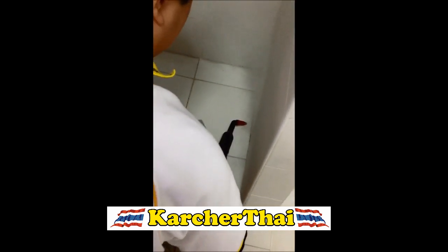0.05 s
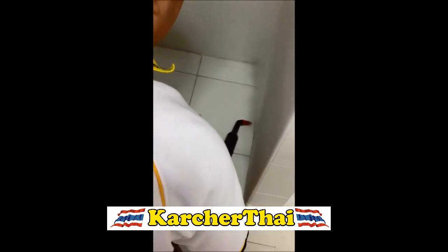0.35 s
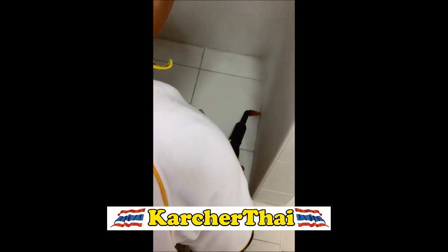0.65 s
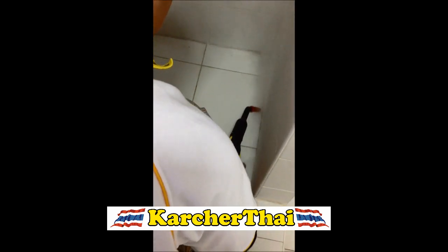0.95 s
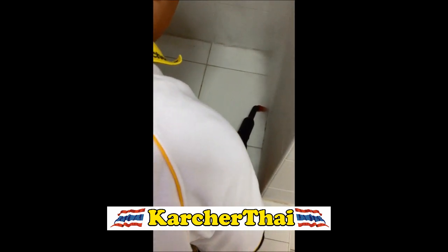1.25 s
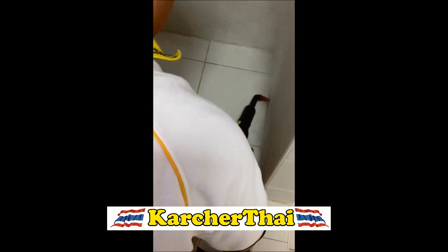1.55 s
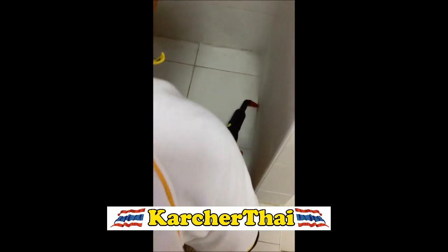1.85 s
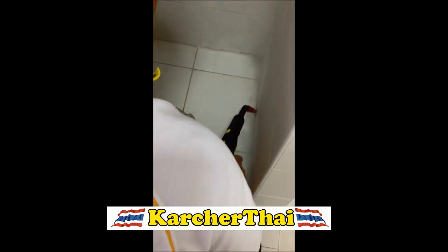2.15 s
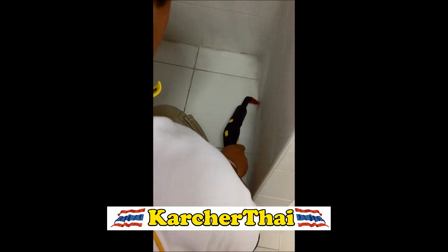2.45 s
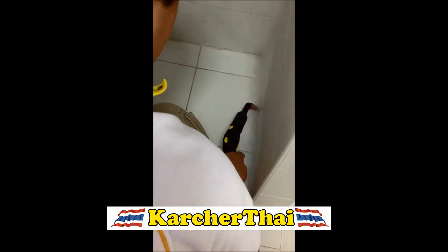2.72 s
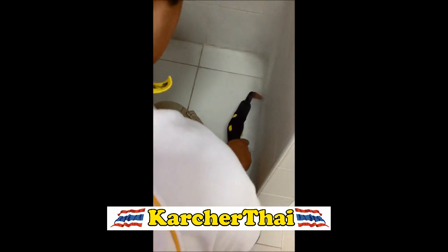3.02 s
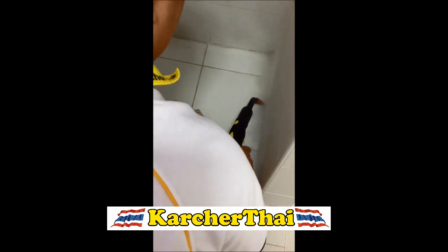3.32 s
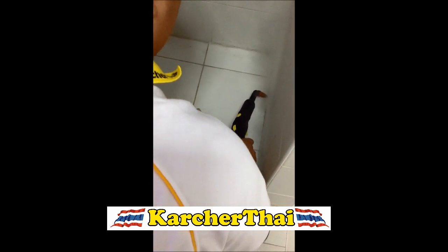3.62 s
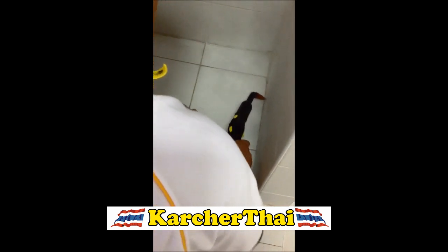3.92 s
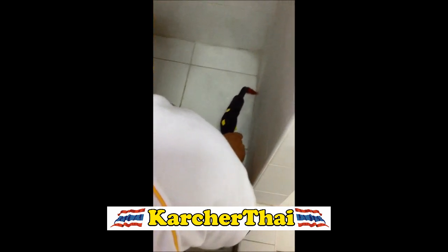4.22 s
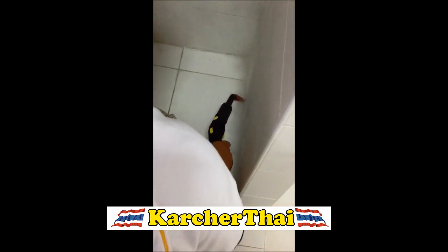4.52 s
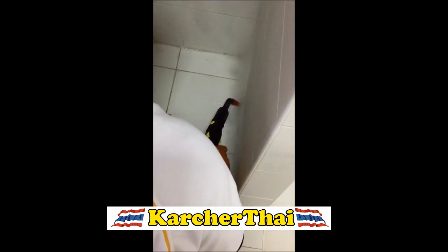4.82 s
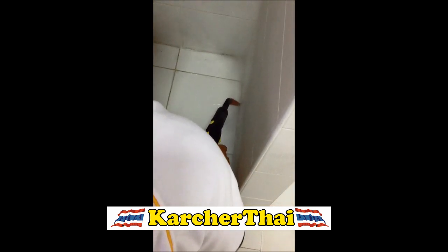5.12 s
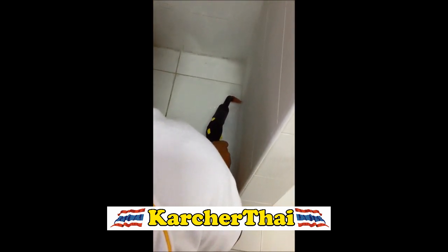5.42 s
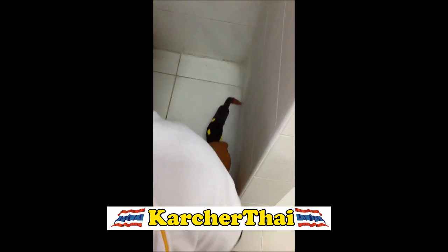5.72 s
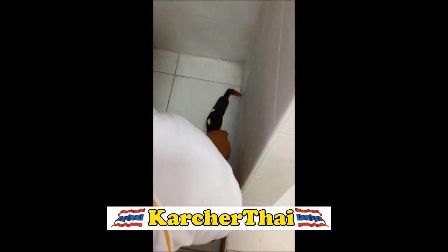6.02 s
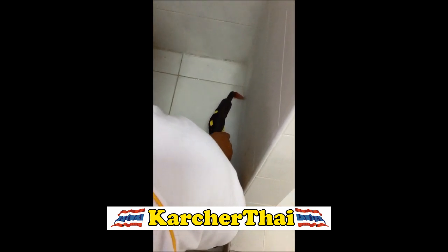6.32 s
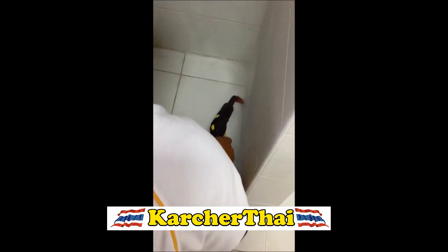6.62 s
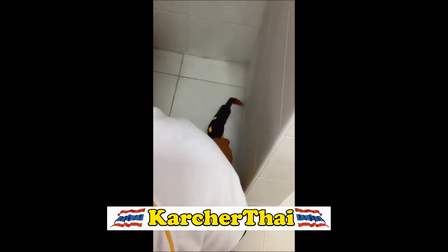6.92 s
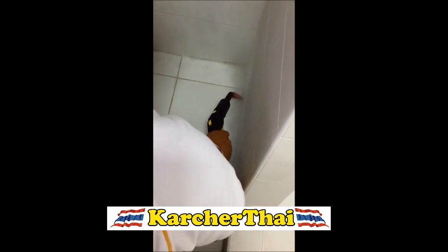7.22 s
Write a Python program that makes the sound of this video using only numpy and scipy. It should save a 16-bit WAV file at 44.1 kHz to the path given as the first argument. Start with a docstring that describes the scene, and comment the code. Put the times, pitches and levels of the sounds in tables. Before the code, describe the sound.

A steam cleaner's hand nozzle hisses loudly and continuously against bathroom tiles, swelling into a roar as it sweeps.

```python
"""Steam jet in a tiled bathroom

A steam cleaner's hand nozzle blasts into the corner of a small bathroom, close to the microphone.
The free jet hisses; where it strikes the tiles it roars, swelling as the hand sweeps it along.
Dense echoes off the near walls ripple the noise and shift with the nozzle, and the room booms at its
modes over a faint rumble. A noise suppressor hollows out the low rush."""
import sys
import numpy as np
from scipy import signal
from scipy.fft import rfft, irfft
from scipy.io import wavfile
from scipy.ndimage import uniform_filter1d

SR = 44100
rng = np.random.default_rng(int(sys.argv[2]) if len(sys.argv) > 2 else 0)


def generate_wav(sig):
    """Save sig (samples, or channels by samples) to the path in sys.argv[1] as 16-bit PCM at SR."""
    pcm = np.round(np.clip(np.atleast_2d(sig).T, -1, 1) * 32767).astype(np.int16)
    wavfile.write(sys.argv[1], SR, pcm)


N = 324576
FRAME, HOP = 2048, 256  # samples

# Tone of the jet. Each row: frequency in Hz, relative level in dB.
JET_TONE = [(300, -9.5), (450, -11.5), (620, -9), (900, -4.5), (1300, -7.5), (1800, -4), (2800, -4.5),
            (4500, -3), (7000, -1.9), (10000, -0.7), (12000, -0.5), (13800, -1.7), (15200, -2.35)]
# The jet's body, roar, rush, hiss and fizz. Each row: centre in Hz, share of the strokes and glances,
# share of the slow roar, share of the turns, drift in dB.
JET_BANDS = [(680.0, 0.38, 0.93, 0.28, 0.6), (1530, 0.72, 1.02, -0.011, 0.4), (3330, 0.9, 0.53, -0.16, 0.5),
             (7140, 0.66, 0.011, 0.42, -0.05), (11700.0, 0.42, 0.086, 0.99, -0.53)]
# The hand sweeps the jet close onto the tiles. Each row: peak time in seconds, attack, hold and release
# in seconds, swell in dB before each band's share, brightening in dB per octave.
STROKES = [(0.182, 0.051, 0.054, 0.044, 1.5, -0.6), (0.43, 0.04, 0.097, 0.094, 4.5, 0),
           (0.712, 0.057, 0.046, 0.071, 5, -0.9), (0.904, 0.12, 0.12, 0.084, 4.5, -0.55),
           (1.092, 0.043, 0.14, 0.048, 4, -0.6), (1.292, 0.04, 0.024, 0.016, 5.5, -0.5),
           (1.514, 0.076, 0.11, 0.033, 2, 0), (1.8, 0.14, 0.16, 0.044, 4, -0.9),
           (2.018, 0.041, 0.023, 0.055, 5.5, -0.5), (2.222, 0.12, 0.026, 0.037, 3.5, -0.5),
           (2.394, 0.062, 0.033, 0.071, 4.5, -0.9), (2.53, 0.07, 0.1, 0.049, 2.5, -0.2),
           (2.695, 0.032, 0.037, 0.019, 4.5, -0.5), (2.829, 0.05, 0.042, 0.037, 2.3, -0.6),
           (3.035, 0.049, 0.039, 0.063, 3.5, 0.1), (3.362, 0.025, 0.02, 0.05, 1.2, -0.5),
           (3.463, 0.1, 0.074, 0.072, 4.5, -0.3), (3.753, 0.14, 0.15, 0.045, 6, -1),
           (3.975, 0.068, 0.085, 0.098, 5.5, -0.4), (4.227, 0.12, 0.056, 0.038, 1, 0.7),
           (4.36, 0.077, 0.066, 0.048, 3, -0.2), (4.585, 0.052, 0.047, 0.076, 0.3, 0.4),
           (4.673, 0.046, 0.075, 0.071, 3.5, 0.3), (4.852, 0.056, 0.021, 0.041, -0.8, 0.3),
           (5.008, 0.052, 0.049, 0.083, 1.5, 0.5), (5.274, 0.053, 0.015, 0.048, 3, 0.3),
           (5.374, 0.054, 0.093, 0.097, 2.1, 0.4), (5.752, 0.074, 0.044, 0.045, 0.5, -0.3),
           (6.074, 0.12, 0.058, 0.045, 5.5, -0.5), (6.196, 0.052, 0.012, 0.049, 3, -0.2),
           (6.696, 0.15, 0.1, 0.033, 2.5, -0.1), (6.857, 0.082, 0.046, 0.06, 5, -0.3),
           (6.974, 0.053, 0.051, 0.026, 3.5, -0.3), (7.308, 0.02, 0.028, 0.05, 4, -0.8)]
# The jet glances off the tiles. Each row: time in seconds, hold in seconds, dip in dB before each
# band's share.
GLANCES = [(1.416, 0.035, 2), (2.847, 0.049, 2), (3.215, 0.085, 2), (4.941, 0.018, 2.5),
           (5.667, 0.015, 1.5), (5.87, 0.04, 2.5), (7.124, 0.075, 3.5)]
# The nozzle turns away and the fizz dulls. Each row: time in seconds, hold and return in seconds,
# dip in dB before each band's share.
TURNS = [(0.01, 0.14, 0.043, 7), (0.48, 0.07, 0.1, 5), (0.93, 0.38, 0.41, 1.5), (3.628, 0.22, 0.346, 4)]
# Slow ride of the roar on the tiles. Each row: time in seconds, level in dB before each band's share.
ROAR_RIDE = [(0.0, 3.5), (0.3, 2.5), (0.85, -2.5), (1.25, -1.7), (1.42, -2), (2.25, -2.5), (2.9, -2.5),
             (3.25, -2.5), (3.85, -3.5), (4.4, 0), (4.9, -2.1), (5.6, -2.5), (6.4, -4.5), (6.9, -3.5),
             (7.15, -3), (7.36, -3.7)]
# Resonances of the tiled corner. Each row: centre in Hz, width in Hz, lift in dB.
CORNER_RESONANCES = [(388, 18, 7), (425, 18, 4), (495, 16, 8.5), (554, 18, 7), (624, 22, -4), (705, 20, 6),
                     (791, 32, 3.2), (867, 18, -3.5), (921, 18, -3), (1070, 32, 3.1), (1200, 18, 6),
                     (1244, 18, 7), (1325, 20, 7), (1394, 18, 2.5), (1427, 18, 4.5), (1470, 32, 3.5),
                     (1529, 18, 4.3), (1879, 18, -4.6), (1920, 32, 2.6), (2158, 32, 3.7), (2401, 24, 5),
                     (2455, 32, 3.2), (2568, 32, 2.4), (2767, 60, 2.6), (2890, 32, 4.2), (3045, 22, 5),
                     (3196, 18, 3.5), (3273, 24, 4.5), (3381, 32, 2.4), (3531, 32, 2.7), (3612, 18, 2.8),
                     (3887, 18, 3.2), (4014, 18, 4), (4052, 24, 3.2), (4296, 18, 2.5), (4339, 18, 1.8),
                     (4683, 60, 2.3), (6029, 32, 2.8), (6228, 32, 2.9), (7327, 60, 2.4), (9284, 60, 1.5),
                     (14072, 80, 2)]
# The jet catches an edge or a resonance and whistles breathily. Each row: peak time in seconds,
# hold in seconds, pitch in Hz, width in Hz, lift in dB.
WHISTLES = [(0.04, 0.056, 650, 110, 9), (0.04, 0.15, 1060, 45, 9), (0.15, 0.5, 2164, 40, 6),
            (.3, .4, 5049, 45, 7), (.45, .25, 1065, 35, 6), (.55, .3, 7525, 50, 6),
            (0.6, 0.65, 3197, 35, 5.5), (.7, .35, 640, 35, 8), (1.07, .28, 4672, 45, 6),
            (1.28, 0.03, 3380, 300, 7), (1.62, .42, 7127, 50, 7), (1.9, .68, 2411, 35, 3.5),
            (2.2, .04, 780, 150, 4), (2.2, .38, 3531, 40, 6), (2.33, 0.15, 2700, 1000, 2),
            (2.43, .33, 4015, 30, 2.5), (2.5, 0.056, 386, 50, 9), (3.55, .3, 4015, 30, 4),
            (3.24, .28, 4683, 45, 5), (3.48, 0.066, 1470, 150, 5.5), (3.72, .28, 6589, 50, 8),
            (3.77, 0.28, 1215, 60, 5), (3.85, 0.18, 3300, 2200, 1.2), (3.87, .03, 850, 250, 4),
            (4.0, 1.3, 7327, 50, 4), (4.15, 0.13, 1530, 80, 2.5), (4.28, 0.32, 4048, 40, 3.5),
            (4.62, 0.18, 4350, 55, 6), (5.0, .18, 4350, 55, 6), (4.6, .32, 2713, 40, 7),
            (4.65, 0.2, 1620, 80, 6), (5.32, .26, 2390, 35, 5), (5.63, .23, 4597, 45, 7),
            (6.5, .55, 4015, 35, 4), (6.85, 0.08, 680, 121, 4), (6.85, .04, 3350, 450, 4.5),
            (7.23, .13, 3240, 40, 7)]
# A narrow band briefly drops out, hollowing the rush. Each row: time in seconds, hold in seconds,
# centre in Hz, width in Hz, change in dB.
HOLLOWS = [(.05, .35, 5620, 160, -8), (.77, .08, 580, 70, -8), (.98, .03, 400, 80, -12),
           (1.23, .1, 865, 60, -8), (1.2, .4, 615, 55, -8), (1.72, .06, 385, 90, -17),
           (1.74, .1, 1880, 200, -8), (1.95, .15, 630, 50, -12), (2.37, .05, 920, 70, -9),
           (2.57, .1, 625, 45, -11), (2.8, .04, 580, 120, -18), (3.17, .05, 970, 110, -10),
           (3.17, .05, 370, 60, -5), (3.62, .09, 625, 70, -13), (3.97, .3, 630, 45, -9),
           (4.46, .05, 590, 100, -16), (4.52, .07, 1000, 70, -11), (4.83, .22, 630, 55, -11),
           (5.3, .12, 925, 70, -12), (5.42, .06, 480, 80, -14), (5.9, .06, 590, 110, -13),
           (5.98, .15, 930, 60, -10), (6.07, .04, 460, 110, -19), (6.38, .05, 390, 50, -8),
           (6.52, .18, 1140, 50, -6), (6.98, .04, 410, 50, -10), (7.06, .03, 690, 60, -7)]
# Depth of the small chance hollows. Each row: frequency in Hz, cut in dB per unit of random excess.
SMALL_HOLLOW_DEPTH = [(330, 0), (480, 8), (1100, 8), (2000, 4.5), (4000, 0)]
# Wet mix of the shifting echoes. Each row: frequency in Hz, share of the power from 0 to 1.
ECHO_MIX = [(400, .75), (1000, .75), (3000, .72), (12000, .8)]
# Still ripple left by the walls' echoes. Each row: frequency in Hz, rms depth in dB.
WALL_RIPPLE = [(1500, 0), (2800, .6), (5000, .7), (15000, .5)]
# Bass modes of the room. Each row: centre in Hz, width in Hz, relative level in dB.
ROOM_MODES = [(185, 11.7, 3), (206, 26, -2.5), (307, 42, -1.5), (312.4, 17, -3)]
# The bass boom briefly swells or sags. Each row: time in seconds, hold in seconds, change in dB.
BOOM_SWELLS = [(0.17, 0.066, 6.5), (0.37, .08, 3), (0.69, 0.024, 2), (0.9, 0.026, 1.5), (1.08, 0.027, -3.5),
               (1.19, 0.016, 3), (1.36, 0.13, -8.5), (1.68, 0.056, -15.5), (1.97, 0.27, -2), (2.3, 0.12, 0),
               (3.23, 0.085, -4.5), (3.9, 0.27, 4), (4.13, 0.018, -8), (4.28, 0.17, 3.5),
               (4.66, 0.27, -1.5), (5.18, 0.22, 2.5), (5.9, 0.037, -8), (6.45, 0.07, -2.5),
               (6.81, 0.035, 2), (7.12, 0.092, -4)]
# The room's narrowest mode, which hums. Its row: centre in Hz, width in Hz, relative level in dB.
HUM_MODE = [(253, 2.7, 0)]
# The hum swells or fades as the nozzle passes. Each row: time in seconds, hold in seconds, change in dB.
HUM_SWELLS = [(0.0, 0.085, -1.5), (0.35, 0.2, 7), (0.78, 0.079, 7), (1.07, 0.056, -16), (1.38, 0.095, 7),
              (1.92, 0.2, 9), (2.38, .15, 6.5), (2.62, .03, 1), (2.73, 0.034, 7.5), (3.14, 0.12, -14.5),
              (4.9, 0.092, 8), (5.23, 0.033, -2.5), (6.62, .08, -0.5)]
# Tone of the rumble. Each row: frequency in Hz, relative level in dB.
RUMBLE_TONE = [(20, -38), (48, -18), (70, 0), (85, 0), (115, -6), (200, -20), (500, -60)]
# Stereo width between the two microphone ports. Each row: frequency in Hz, side gain in dB.
STEREO_WIDTH = [(40, -12), (90, -9), (180, -8), (350, -8), (700, -10.5), (1400, -16), (2800, -21),
                (5600, -17), (9500, -18), (12500, -13.5), (14500, -10.5)]
# Threshold of the noise suppressor. Each row: frequency in Hz, band level in dB.
GATE_THRESHOLD = [(150, -90), (270, -56), (380, -53), (600, -54), (950, -52), (1150, -52.5), (1400, -54),
                  (2500, -55)]


def steam_jet(level_db=-12, flutter_db=0.49):
    """Turbulent noise, coloured by the corner, swells band by band as the jet meets the tiles."""
    t, hz = frame_times(extra=5), spectrum_hz()
    noise = turbulence(t)
    corner_db = sum(lift_db * bell(hz, f, width) for f, width, lift_db in CORNER_RESONANCES)
    tone_db = curve_at(JET_TONE, hz) + corner_db + standing_ripple(hz)
    spectrum = rfft(noise) * gain_of(tone_db) * low_cut(hz, edge_hz=304)
    steam, centres = 0, [band[0] for band in JET_BANDS]
    for band, solo in zip(JET_BANDS, np.eye(len(JET_BANDS))):
        crossover = curve_at(np.column_stack([centres, solo]), hz)
        steam = steam + hand_sweep(*band) * irfft(spectrum * crossover, N)
    flutter = gain_of(flutter_db * to_samples(t, wander(t, 11, 40)))
    mid, side = steam * flutter
    return gain_of(level_db) * stereo(unit_rms(mid), unit_rms(side))


def turbulence(t, eddy_db=1.0):
    """Mid and side noise: eddies light up narrow bands, and the walls' echoes ripple them."""
    hz = np.fft.rfftfreq(FRAME, 1 / SR)
    shape = (len(t), len(hz))
    eddies = patches(shape, frames=16, bins=24)
    noise = rng.standard_normal((2, *shape)) + 1j * rng.standard_normal((2, *shape))
    colour_db = eddy_db * eddies + passing_colour(t, hz) + small_hollows(hz, shape)
    wet = curve_at(ECHO_MIX, hz)
    noise *= gain_of(colour_db) * np.sqrt(1 - wet + wet * wall_echoes(t, hz) ** 2)
    return signal.istft(noise, nperseg=FRAME, noverlap=FRAME - HOP, time_axis=1, freq_axis=2)[1][:, :N]


def hand_sweep(centre_hz, stroke_share, roar_share, turn_share, drift_db):
    """One band's gain, rms 1: the lower bands follow contact with the tiles, the fizz the nozzle's aim."""
    t = frame_times()
    pivot_hz, slip_s, regain_s, turn_s = 3400, 0.023, 0.045, 0.13
    octaves = np.log2(centre_hz / pivot_hz)
    stroke_db = sum((stroke_share * db + tilt * octaves) * gesture(t, at, attack, hold, release)
                    for at, attack, hold, release, db, tilt in STROKES)
    glance_db = sum(db * gesture(t, at, slip_s, hold, regain_s) for at, hold, db in GLANCES)
    away_db = sum(db * gesture(t, at, turn_s, hold, back) for at, hold, back, db in TURNS)
    roar_db = np.interp(t, *np.transpose(ROAR_RIDE))
    level_db = stroke_db - stroke_share * glance_db + roar_share * roar_db - turn_share * away_db
    return unit_rms(to_samples(t, gain_of(level_db + drift_db * wander(t, 3, 12))))


def passing_colour(t, hz, waver=0.2, whistle_fade_s=0.052, hollow_fade_s=0.036):
    """Moving EQ in dB: the corner's resonances wax and wane; whistles and hollows come and go."""
    db = sum(np.outer(waver * lift_db * wander(t, 0.781, 5), bell(hz, f, width + hz[1]))
             for f, width, lift_db in CORNER_RESONANCES)
    for events, fade_s in ((WHISTLES, whistle_fade_s), (HOLLOWS, hollow_fade_s)):
        for at, hold, f, width, change_db in events:
            db = db + change_db * np.outer(gesture(t, at, fade_s, hold, fade_s), bell(hz, f, width))
    return db


def small_hollows(hz, shape):
    """Moving EQ in dB: brief, narrow notches open by chance in the low rush."""
    excess = np.maximum(patches(shape, frames=16, bins=4) - 0.5, 0)
    return -curve_at(SMALL_HOLLOW_DEPTH, hz) * excess


def wall_echoes(t, hz, decay_ms=16.0, sway_m=0.05, pattern_count=48):
    """Gain by time and frequency of dense echoes, whose pattern shifts as the nozzle sways."""
    lag = np.arange(FRAME) / SR
    tail = np.exp(-lag * 1000 / decay_ms)
    response, bins = 0, np.arange(len(hz))
    for _ in range(2):  # the hand sways along two directions
        patterns = rfft(rng.standard_normal((pattern_count, FRAME)) * tail)
        travel_m = sway_m * wander(t, 0.1187, 1.5)[:, None]
        # a new pattern every half wavelength of travel: the treble shifts fastest
        place = travel_m * 2 * hz / 343 + rng.random()
        near = np.floor(place).astype(int)
        crossfade = place % 1 * np.pi / 2
        response = response + np.cos(crossfade) * patterns[near % pattern_count, bins]
        response = response + np.sin(crossfade) * patterns[(near + 1) % pattern_count, bins]
    # the echoes only move energy between neighbouring frequencies and moments
    power = abs(response) ** 2
    power = power / uniform_filter1d(power, size=50, axis=1)
    return np.sqrt(power / power.mean(0))


def standing_ripple(hz):
    """Static EQ in dB: echoes between the walls leave many narrow, still peaks in the treble."""
    ripple = unit_rms(uniform_filter1d(rng.standard_normal(len(hz)), size=300))
    return curve_at(WALL_RIPPLE, hz) * ripple


def room_boom(modes, level_db):
    """The jet's low turbulence rings bass modes of the small, hard room."""
    hz = spectrum_hz()
    power = sum(gain_of(db) ** 2 * bell(hz, f, width) for f, width, db in modes)
    tone = np.sqrt(power) * low_cut(hz, edge_hz=161.5, order=10) / (1 + (hz / 370) ** 10)
    mid, side = shaped_noise(tone)
    envelope = np.sqrt(uniform_filter1d(mid ** 2, size=12000))
    return gain_of(level_db) * stereo(mid / envelope, unit_rms(side))


def bass_ride(events, fade_s, drift_db):
    """Level change in dB of a bass layer: swells and sags over a slight drift."""
    t = frame_times()
    db = sum(change_db * gesture(t, at, fade_s, hold, fade_s) for at, hold, change_db in events)
    return to_samples(t, db + drift_db * wander(t, 3.4, 8))


def rumble(boom_ride_db, level_db=-69.5, follow=0.84):
    """A faint bed below the room's lowest strong mode, rising and falling with the boom."""
    noise = shaped_noise(gain_of(curve_at(RUMBLE_TONE, spectrum_hz())))
    mid, side = noise * gain_of(follow * boom_ride_db)
    return gain_of(level_db) * stereo(unit_rms(mid), unit_rms(side))


def noise_suppressor(dry, cut_per_db=2.6, deepest_db=15):
    """Ducks narrow bands that fall under the threshold, so the low rush turns hollow."""
    hz, _, bands = signal.stft(dry, SR, nperseg=FRAME, noverlap=FRAME - HOP)
    power = uniform_filter1d(abs(bands.mean(0)) ** 2, size=3, axis=0)  # across frequency
    power = uniform_filter1d(power, size=7, axis=1)  # across time
    under_db = curve_at(GATE_THRESHOLD, hz)[:, None] - 10 * np.log10(abs(power) + 1e-14)
    cut_db = uniform_filter1d(np.clip(cut_per_db * under_db, 0, deepest_db), size=3, axis=0)
    return signal.istft(bands * gain_of(-cut_db), nperseg=FRAME, noverlap=FRAME - HOP)[1][:, :N]


def stereo(mid, side):
    """Left and right: the diffuse part of the sound differs between the microphone ports."""
    side = irfft(rfft(side) * gain_of(curve_at(STEREO_WIDTH, spectrum_hz())), N)
    return np.array([mid + side, mid - side])


def gesture(t, at, attack, hold, release):
    """Envelope of one move, 0 to 1: fully up at time `at`, then held and released."""
    return np.interp(t, at + np.array([-attack, 0, hold, hold + release]), [0, 1, 1, 0])


def wander(t, slow_hz, fast_hz):
    """Smooth random motion, rms 1."""
    rates = np.geomspace(slow_hz, fast_hz, num=24)
    return unit_rms(sum(np.sin(2 * np.pi * (f * t + rng.random())) / np.sqrt(f) for f in rates))


def patches(shape, frames, bins):
    """Random blotches in time and frequency, rms 1."""
    smeared = uniform_filter1d(rng.standard_normal(shape), frames, axis=0)
    return unit_rms(uniform_filter1d(smeared, bins, axis=1))


def shaped_noise(tone):
    """Mid and side noise through one EQ."""
    return irfft(rfft(rng.standard_normal((2, N))) * tone, N)


def bell(hz, centre_hz, width_hz):
    """Shape of a resonance, peaking at 1."""
    return 1 / (1 + (2 * (hz - centre_hz) / width_hz) ** 2)


def low_cut(hz, edge_hz, order=8):
    """Gain of a steep high-pass."""
    return 1 / np.sqrt(1 + (edge_hz / (hz + 1)) ** (2 * order))


def curve_at(points, hz):
    """Reads a table on a log-frequency axis."""
    f, value = np.transpose(points)
    return np.interp(np.log(hz + 1), np.log(f + 1), value)


def spectrum_hz():
    """Frequencies of a full-length spectrum."""
    return np.fft.rfftfreq(N, 1 / SR)


def frame_times(extra=2):
    """Frame times in seconds, running a little past the end."""
    return np.arange(N // HOP + extra) * HOP / SR


def to_samples(t, curve):
    """Brings a control curve up to audio rate."""
    return np.interp(np.arange(N) / SR, t, curve)


def gain_of(db):
    """Decibels to amplitude."""
    return 10 ** (np.asarray(db) / 20)


def unit_rms(x):
    """Scales to rms 1."""
    return x / np.sqrt(np.mean(x ** 2) + 1e-20)


def scene():
    """The jet up front, the room's boom and hum behind it, the rumble underneath."""
    boom_ride_db = bass_ride(BOOM_SWELLS, fade_s=0.074, drift_db=1)
    hum_ride_db = bass_ride(HUM_SWELLS, fade_s=0.12, drift_db=0.5)
    jet = steam_jet()
    boom = room_boom(ROOM_MODES, level_db=-37.5 + boom_ride_db)
    hum = room_boom(HUM_MODE, level_db=-44 + hum_ride_db)
    return jet + boom + hum + rumble(boom_ride_db)


def record(dry, ceiling=0.86, top_hz=15330):
    """Suppresses weak bands, rounds off the highest peaks, then cuts the top end."""
    gated = noise_suppressor(dry)
    rounded = gated / (1 + (gated / ceiling) ** 14) ** (1 / 14)
    high_cut = signal.firwin(1023, top_hz, window=("kaiser", 9), fs=SR)
    return signal.oaconvolve(rounded, high_cut[None], "same")


dry = scene()
out = record(dry)
generate_wav(out)
```